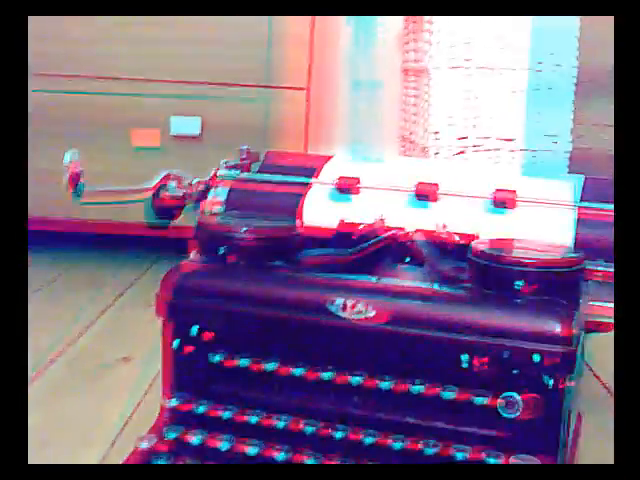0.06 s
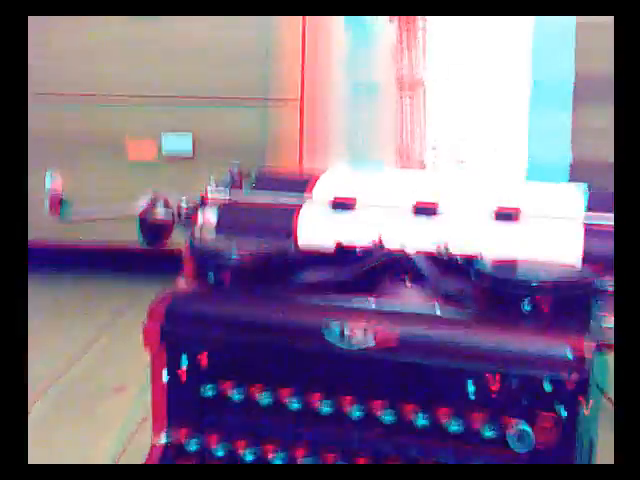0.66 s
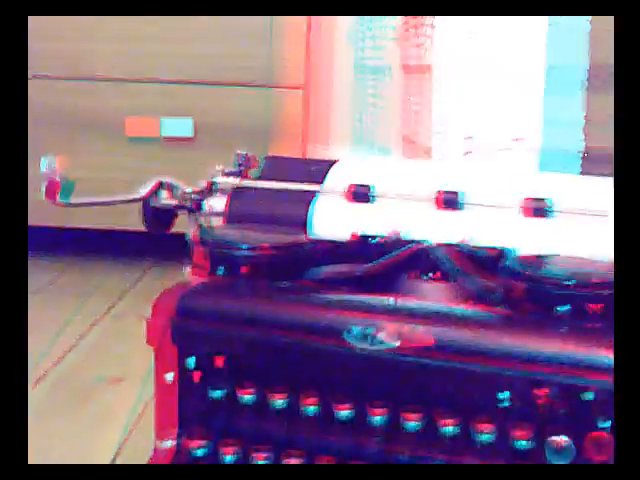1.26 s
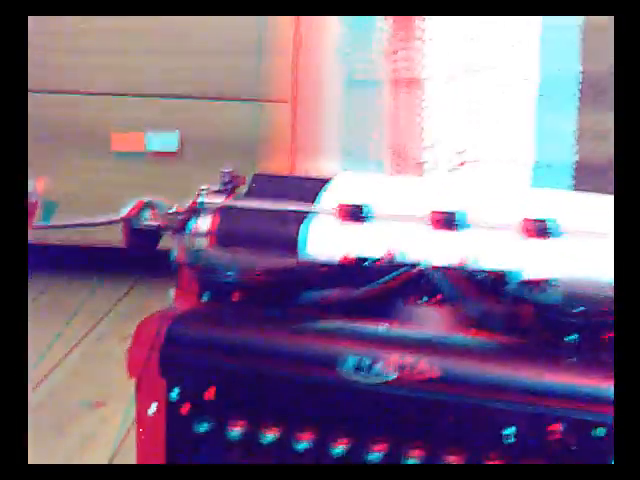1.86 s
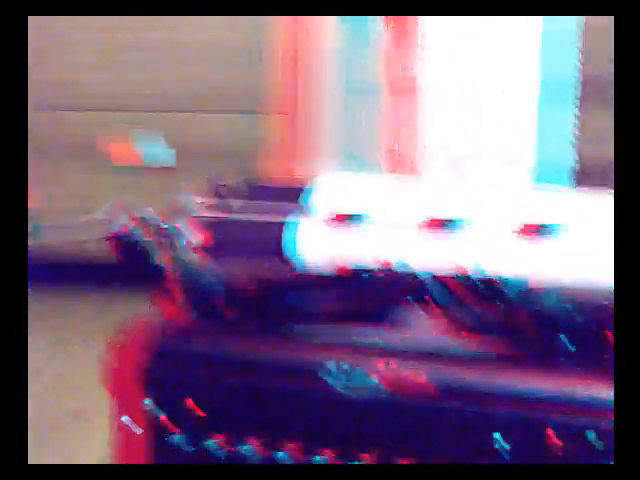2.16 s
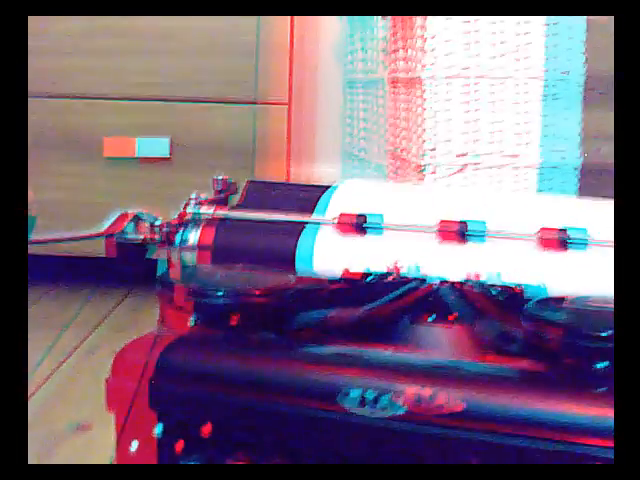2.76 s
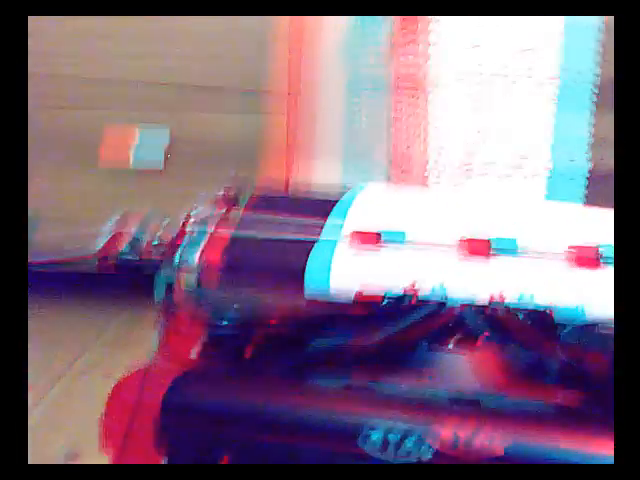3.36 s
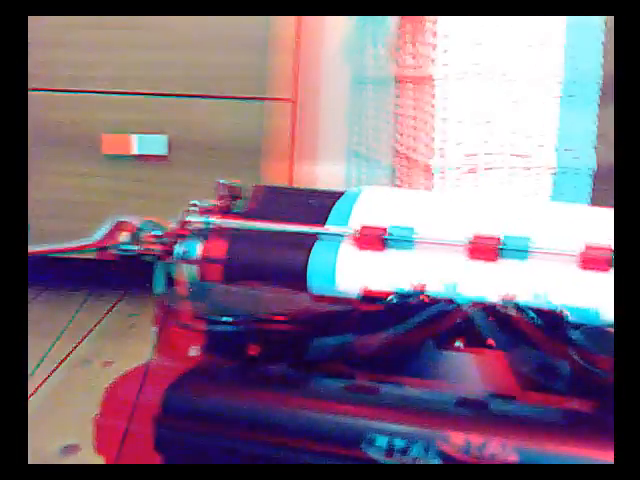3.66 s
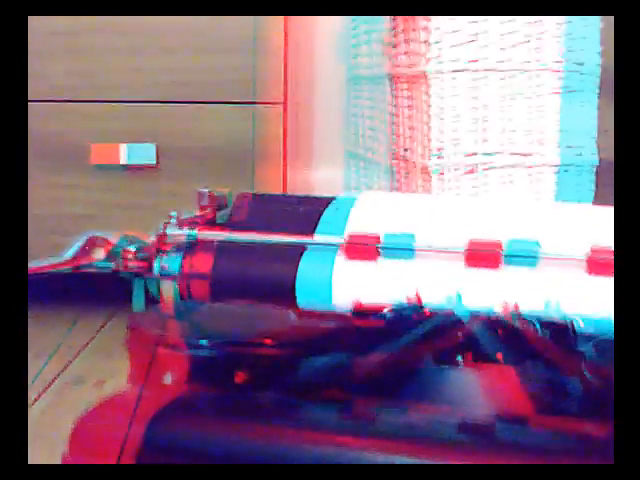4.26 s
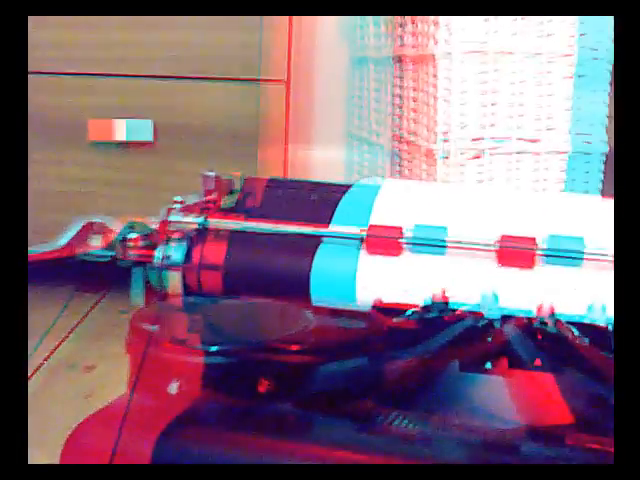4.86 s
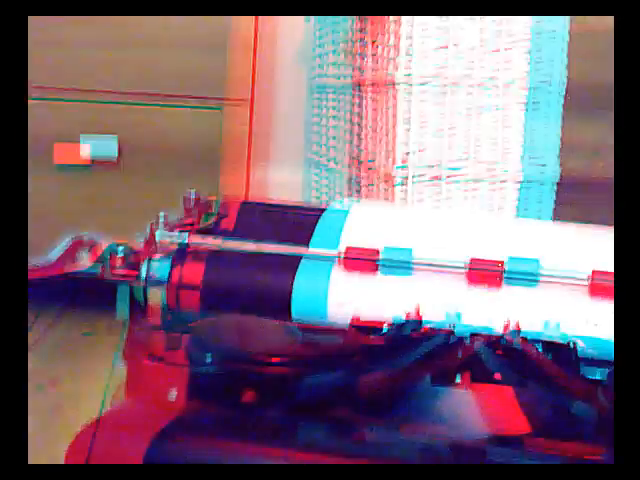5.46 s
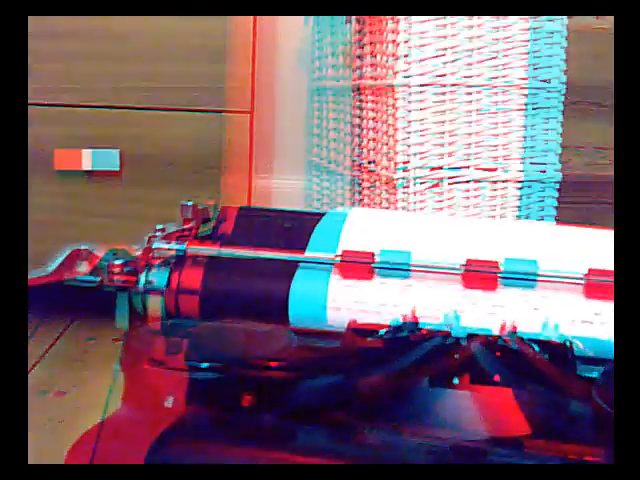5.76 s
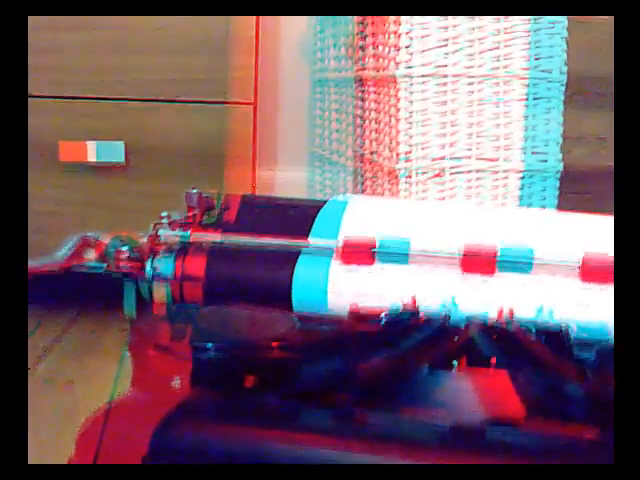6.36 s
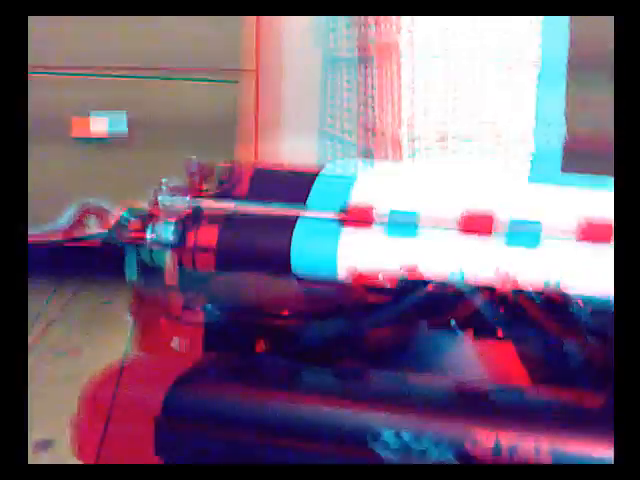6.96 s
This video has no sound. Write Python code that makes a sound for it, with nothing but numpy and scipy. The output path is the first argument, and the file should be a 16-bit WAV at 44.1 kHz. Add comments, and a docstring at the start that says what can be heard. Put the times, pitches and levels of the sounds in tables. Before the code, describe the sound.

A small walking robot crosses a wooden floor indoors, heard from a microphone on its body. For the whole seven seconds its geared servos whir in short, high, raspy moves, about three a second, with a little grinding and a faint motor whistle. The feet land and rock with irregular low knocks and light scuffs, heaviest at about 0.4, 1.3, 2.3, 4.2 and 5.2 seconds. Now and then a gear sings out in a brief rising or falling whine, most clearly near 1.5, 2, 3.4, 4, 5 and 6.7 seconds. Slack gear teeth give scattered sharp clicks, for example around 0.2, 1.6, 4.3, 4.9 and 5.3 seconds. The whirring eases slightly from about 5.5 seconds, then is strongest just after 6.5. Everything is very close, with a short, faint room echo and a soft steady hiss behind it.

```python
"""Geared servos whir right at the microphone, in short moves, about three a second.
The microphone rides on the body of a small walking robot as it crosses a wooden floor.
Now and then one loaded gear sings out in a glide, or slack teeth snap together.
The feet land and rock with low knocks that come up through the frame; the motor drive whistles faintly.
Behind the robot lie a short room tail and a soft hiss."""
import sys
import numpy as np
from scipy import signal
from scipy.fft import rfft, irfft, next_fast_len
from scipy.io import wavfile
from scipy.ndimage import map_coordinates

SR = 44100
rng = np.random.default_rng(int(sys.argv[2]) if len(sys.argv) > 2 else 0)


def master_out(mix):
    """Clip the mix to full scale and print it as 16-bit PCM to the path in sys.argv[1]."""
    frames = np.transpose(np.atleast_2d(mix))
    ceiling = np.clip(frames, -1, 1)
    pcm = np.round(ceiling * 32767).astype(np.int16)
    wavfile.write(sys.argv[1], SR, pcm)


N = 313551

# Servo moves on the way across the floor: (start [s], spin-up [s], driven length [s], whir level [dB],
# fade over the move [dB], gear mesh [Hz], grinding re whir [dB])
SERVO_MOVES = [(-.03, 0.037, 0.13, -56.5, 1, 4423, -14), (.136, .045, .29, -49, 4.5, 3900, -15),
               (0.456, .04, .29, -52, 3.5, 4251, -13.5), (.78, .055, .25, -55.5, 5, 4301, -13.5),
               (1.08, 0.034, 0.27, -53, -1.5, 4279, -11), (1.399, 0.041, 0.28, -51, 1.5, 4284, -15),
               (1.711, 0.059, 0.26, -53.5, 6, 4147, -15.5), (2.013, 0.029, 0.31, -49.5, 5, 3955, -15.5),
               (2.34, .035, .28, -52, 2, 4301, -16), (2.655, 0.052, 0.26, -53, 5.5, 4129, -12.5),
               (2.948, 0.059, .28, -52.5, 3.5, 4330, -12.5), (3.275, .055, .275, -51, -.5, 4300, -13.5),
               (3.584, .06, 0.27, -53, 3.5, 4103, -13.5), (3.892, .012, .294, -49, 2, 3930, -15.5),
               (4.215, .035, .267, -52, 2, 4353, -12), (4.529, .03, .25, -52.5, 3, 4454, -15.5),
               (4.819, .04, 0.29, -52.5, -.5, 4744, -10.5), (5.148, .02, .315, -54.5, -2, 4474, -10.5),
               (5.598, .035, 0.27, -55, 2.5, 4849, -21.5), (5.905, .06, 0.29, -55, 5, 4330, -13.5),
               (6.204, 0.059, 0.3, -55.5, 2, 4335, -12.5), (6.544, .045, 0.27, -46, 2.5, 4080, -18.5),
               (6.845, .06, 0.3, -50.5, 4.5, 4282, -15)]
def gait(hold_db=-73, hold_hz=4242, hold_grind_db=1, run_down_s=0.031, grind_down_s=0.077):
    """Whir dB, mesh Hz and grinding dB re whir as each move spins up, gains speed and runs down."""
    speed_up, start_lag = 0.03, 0.06  # shares of speed: gained as the load eases, lacking at first
    start_grind_db, slow_s = 14, 0.034  # gears grind harder while still slow
    ease_db = 1.5  # dip halfway, where the leg neither gathers nor loses speed
    t = np.arange(N) / SR
    whir = np.full(N, amp(hold_db) ** 2)  # between moves the servos only hold their position
    grind, mesh = whir * amp(hold_grind_db) ** 2, whir * hold_hz
    for start, attack_s, length, db, fade_db, mesh_hz, grind_db in SERVO_MOVES:
        on = (t > start) & (t < start + 2 * length)
        age = t[on] - start
        progress = np.minimum(age / length, 1) - 0.5  # zero at mid-move
        slow = np.exp(-age / slow_s)
        coasting = np.maximum(age - length, 0)
        level_db = db - fade_db * progress - ease_db / 2 * np.cos(2 * np.pi * progress)
        effort = np.minimum(age / attack_s, 1) * amp(level_db)
        power = (effort * np.exp(-coasting / run_down_s)) ** 2
        whir[on] += power
        mesh[on] += power * mesh_hz * (1 + speed_up * progress - start_lag * slow)
        grinding = effort * amp(grind_db + start_grind_db * slow) * np.exp(-coasting / grind_down_s)
        grind[on] += grinding ** 2
    return 10 * np.log10(whir) + strain(), mesh / whir, 10 * np.log10(grind / whir)


# Gearbox, casing and body at point-blank range, each: (frequency [Hz], relative level [dB])
GEARBOX_SPECTRUM = [(1500, -38.5), (2500, -11), (3000, -7), (3400, -1), (4000, -0.5), (4900, 0.5),
                    (5300, -3.5), (6000, -4.5), (6800, -15), (7500, -17.5), (8200, -24), (11000, -39.5)]
CASING_SPECTRUM = [(250, -7), (500, -8), (900, -12.5), (1400, -9), (1650, -2.5), (1950, 1), (2400, -2),
                   (3000, -11), (4000, 1.5), (7000, -65)]
BODY_SPECTRUM = [(20, -8), (45, -10), (65, 8), (125, -2), (180, -0.5), (225, -6), (280, -17), (500, -19.5),
                 (1000, -44)]
def servos(whir_db, mesh_hz, grind_db, tilt_db=16):
    """Three gear trains sing and rattle in their boxes; load grinds slow gears and shakes the body."""
    singing, rattle, judder = np.zeros(N), np.zeros(N), wobble(110)
    for detune in (-0.12, 0, 0.12):
        # each controller feeds its motor in uneven spurts, and all share the judder of the frame
        pulsing = np.sin(cycles(65 * np.exp(0.26 * wobble(8))))
        demand = 0.67 * pulsing + 0.72 * wobble(50) + 0.38 * judder
        spurts = amp(5.75 * np.tanh(demand))
        singing += spurts * gear_train(mesh_hz, detune)
        strike_hz = mesh_hz / 2 * np.exp(detune + 0.1 * wobble(200))
        rattle += spurts * tooth_impacts(strike_hz, scatter_db=10.5)
    # fast teeth rattle brightly, slow ones wake the gearbox's lower ring
    rattle = coloured(rattle, GEARBOX_SPECTRUM)
    low = filtered(rattle, lambda hz: 1 / (1 + (hz / 3900) ** 10))
    bright = amp(tilt_db * np.log2(mesh_hz / 4200))
    rattle = unit(low / bright + (rattle - low) * bright)
    whir = amp(-4.5) * coloured(singing, GEARBOX_SPECTRUM) + amp(-2.5) * rattle
    grind_hz = mesh_hz / 3 * np.exp(0.2 * wobble(200))
    grind = coloured(tooth_impacts(grind_hz, scatter_db=9), CASING_SPECTRUM)
    # a hard-working leg shakes the body out of proportion to its whir
    shake = noise(BODY_SPECTRUM) * amp(0.34 * (whir_db + 43) + 5.11 * wobble(12))
    return amp(whir_db) * (whir + amp(grind_db + 2) * grind + amp(-14) * shake)


def gear_train(mesh_hz, detune, wander=0.07, flutter=0.00997, skirt=0.7, teeth=10):
    """Shaft orders around one pinion's tooth rate, each swelling and fading as the contact shifts."""
    hz = mesh_hz * np.exp(detune + wander * wobble(20) + flutter * wobble(350))
    shaft, out = cycles(hz / teeth), 0
    for order in np.arange(7, 15):
        strength = np.exp(-abs(order - teeth) / skirt + 0.44 * np.tanh(wobble(70)))
        out += strength * np.sin(order * shaft + rng.uniform(0, 2 * np.pi))
    return unit(out)


def tooth_impacts(rate_hz, scatter_db):
    """One impulse of random size for each tooth that strikes."""
    strikes = np.diff(np.floor(np.cumsum(rate_hz) / SR), prepend=0) > 0
    return strikes * amp(scatter_db * rng.uniform(-0.82, 1, N)) * rng.choice([-1, 1], N)


# A leg meets resistance and its servo surges: (time [s], extra whir [dB])
SERVO_SURGES = [(.56, 3), (1.8, 2), (2.105, 3), (3.06, 4), (4.465, 1), (4.572, 2), (5.83, 1.5), (6.015, 3),
                (6.48, 2)]
def strain(landing_db=2.5, width_s=0.015, lead_s=0.021):
    """Extra whir in dB as a leg meets resistance or a foot lands; lighter feet ask less."""
    extra_db, heaviest_db = np.zeros(N + SR), max(row[1] for row in FOOTFALLS)
    landings = [(s - lead_s, landing_db * amp(db - heaviest_db)) for s, db, *_ in FOOTFALLS]
    t = np.arange(-SR // 10, SR // 10) / SR
    for s, db in landings + SERVO_SURGES:
        extra_db[round((s + t[0]) * SR):][:len(t)] += db * np.exp(-(t / width_s) ** 2)
    return extra_db[:N]


# One gear sings out close to the microphone: (start [s], end [s], first pitch [Hz], middle pitch [Hz],
# last pitch [Hz], level [dB], roughness [0-1])
GEAR_GLIDES = [(0.161, 0.256, 3050, 3460, 3750, -58, .93), (1.441, 1.539, 4050, 4344, 3850, -51.5, 0.46),
               (1.448, 1.502, 2550, 2795, 2800, -56, .5), (1.495, 1.546, 2860, 2620, 2460, -53.5, .3),
               (1.519, 1.569, 5150, 4830, 4220, -54.5, .6), (1.561, 1.61, 4320, 4770, 4980, -55, 0.45),
               (1.761, 1.83, 3660, 3414, 3382, -59.5, 0.4), (2.021, 2.126, 3393, 3492, 3720, -51.5, 0.9),
               (3.315, 3.364, 2430, 2680, 2780, -55.5, 0.51), (3.355, 3.409, 2733, 2680, 2542, -51, .2),
               (3.39, 3.451, 5094, 4780, 4550, -51, 0.76), (3.63, 3.698, 3120, 3377, 3682, -58, .85),
               (3.92, 3.992, 3586, 3913, 4115, -49.5, .55), (3.989, 4.037, 3826, 3440, 3360, -55, 0.45),
               (4.24, 4.36, 3900, 4200, 4433, -56.5, 0.75), (4.919, 4.998, 5700, 5590, 5430, -53.5, 0.61),
               (5.012, 5.144, 4800, 5006, 4255, -50, .6), (5.191, 5.275, 2410, 2640, 2730, -58.5, 0.95),
               (5.243, 5.316, 5100, 4705, 4600, -52, 0.65), (5.381, 5.473, 4512, 4733, 4823, -54.5, 0.84),
               (5.659, 5.738, 5035, 5094, 5200, -53.5, .82), (5.948, 6.024, 3900, 4170, 4430, -62, 0.3),
               (6.626, 6.73, 4550, 4140, 3860, -49.5, 0.5), (6.718, 6.81, 3596, 3530, 3810, -54, .45)]
def gear_whines(teeth=10):
    """A loaded gear glides in speed; slack makes it chatter, its off-centre pinion throbs once a turn."""
    out = np.zeros(N)
    chatter = 0.011 * wobble(140) + 0.042 * wobble(1000)
    flicker = unit(amp(3.5 * np.tanh(wobble(220))))
    runout = wobble(120)
    for start, end, first, middle, last, db, rough in GEAR_GLIDES:
        on = np.arange(round(start * SR), round(end * SR))
        progress = np.linspace(0, 1, len(on), endpoint=False)
        glide_hz = np.polyval(np.polyfit([0, 0.5, 1], [first, middle, last], 2), progress)
        phase = cycles(glide_hz * (1 + rough * chatter[on]))
        swell = amp(db + 4.5) * np.sqrt(np.sin(np.pi * progress))
        throb = 1 + 0.5 * rough * runout[on] * np.sin(phase / teeth)
        out[on] += swell * flicker[on] * throb * np.sin(phase)
    return out


# Feet on the boards just below the microphone:
# (time [s], level [dB], pitch [Hz], rocking interval [s], hardness [dB], relative scuff [dB])
FOOTFALLS = [(0.206, -42, 90.5, 0.03, -20, -33), (.405, -33, 117, 0.023, 0.5, -29.5),
             (.742, -43.5, 65, .02, -15, -22), (1.108, -52.5, 58, .02, -14, -17),
             (1.305, -35.5, 100, 0.025, -10, -30), (1.51, -42, 100.9, 0.027, -21, -23.5),
             (1.575, -47.5, 70, 0.013, -25, -30), (1.658, -36, 75.5, .019, -6.5, -30.5),
             (2.085, -49, 72, 0.029, -21, -26.5), (2.29, -33.5, 121, 0.022, -4.5, -28.5),
             (2.613, -37, 86.96, 0.026, -21.5, -27.5), (3.008, -42.5, 66.92, .012, -22.5, -29.5),
             (3.19, -39, 92.77, 0.03, -20, -27), (3.332, -38, 92, 0.026, -2, -23.5),
             (3.408, -47, 100, .011, -20, -33), (3.533, -36.5, 69, 0.02, -10, -29),
             (3.942, -47, 88.04, .011, -15, -26), (3.998, -48, 68, .011, -21, -30),
             (4.16, -33, 121.8, 0.0211, -27, -28.5), (4.272, -50, 75.9, 0.0093, -8, -31),
             (4.447, -39.5, 66, 0.022, -24, -24), (4.886, -42, 95, .022, -22, -23),
             (4.998, -40, 96.5, .034, -27, -30.5), (5.162, -35, 117.9, 0.00497, -14, -27),
             (5.214, -38, 89.5, .017, 0.5, -25.5), (5.312, -47.5, 235, 0.0093, -12, -15),
             (5.348, -51, 74.96, .011, -23, -27), (5.458, -46.5, 70, .013, -36, -27),
             (5.893, -41, 60, 0.036, -16, -24), (6.237, -44.5, 72.07, 0.026, -24, -24.5),
             (6.487, -43.5, 77.77, .022, -2.5, -27), (6.612, -45, 90.24, 0.025, -9, -22.5),
             (6.787, -45, 140.9, 0.015, 3, -20.5), (6.925, -49, 76.05, .028, -16, -22),
             (7.086, -44, 95, 0.019, -8, -26.5)]
# Every foot rocks over hard edge, sole and soft heel:
# (offset [rocking intervals], level [dB], pitch [ratio], extra hardness [dB], extra scuff [dB])
FOOT_ROCKING = [(-1, -5.5, 1.2, 4, 7.5), (0, -.5, 0.92, 0, -9), (1, -6, 0.96, -9.5, 0)]
# The frame ringing on the floorboards: (frequency [Hz], level [dB], t60 [s])
FRAME_MODES = [(66, -2, .15), (90, -1, .11), (122, 0, .11), (155, -5, .08), (195, -8, .06), (226, -4, .12),
               (315, -9, .07), (400, -12, .05)]
# A foot rubbing on wood: (frequency [Hz], relative level [dB])
SCUFF_SPECTRUM = [(20, -12), (60, -7), (200, 15.5), (330, 6.5), (600, 1), (1200, -5.5), (2500, -18),
                  (6000, -76)]
def footsteps(press_s=0.014, scuff_t60=0.19, focus_db_per_octave=8):
    """Each padded contact rings the frame's modes nearest its own pitch, and scuffs the boards."""
    knocks, rubbing, t = np.zeros(N + SR), np.zeros(N + SR), np.arange(SR // 4) / SR
    swell = np.sin(np.pi / 2 * np.minimum(t / press_s, 1)) ** 2  # the foot takes the weight
    hz, mode_db, t60 = np.transpose(FRAME_MODES)[:, :, None]
    for s, db, pitch_hz, rock_s, hard_db, scuff_db in FOOTFALLS:
        for offset, share_db, ratio, harder_db, rub_db in FOOT_ROCKING:
            weight_db = mode_db - focus_db_per_octave * abs(np.log2(hz / (pitch_hz * ratio)))
            # a hard landing reaches further into the upper modes
            weight_db += 0.51 * (hard_db + harder_db + 14) * np.log2(hz / 120)
            phase = 2 * np.pi * (hz * rng.normal(1, 0.032, hz.shape) * t + rng.uniform(size=hz.shape))
            ring = swell * np.sum(amp(weight_db - 60 * t / t60) * np.sin(phase), axis=0)
            scuff = swell * amp(scuff_db + rub_db + 10 - 60 * t / scuff_t60)
            start = round((s + offset * rock_s - press_s / 2) * SR)
            knocks[start:][:len(t)] += amp(db + share_db - 16.5) * unit(ring)
            rubbing[start:][:len(t)] += amp(db + share_db) * scuff
    return knocks[:N] + rubbing[:N] * noise(SCUFF_SPECTRUM)


# Sharp snaps from the gears, close up: (time [s], level [dB])
BACKLASH_SNAPS = [(0.2243, -47), (1.6378, -47.5), (2.109, -51), (2.2695, -49.5), (3.0598, -49.5),
                  (3.9, -48), (3.975, -56), (4.2712, -45), (4.4267, -49), (4.5648, -60), (4.873, -43.5),
                  (5.162, -53), (5.3, -46.5), (6.0344, -53), (6.5487, -52)]
def backlash(t60=0.068, attack_s=0.001):
    """Slack gear teeth slap together when the load turns round."""
    out, t = np.zeros(N + SR), np.arange(SR // 10) / SR
    spectrum = [(800, -27), (2500, 15), (4000, 15.5), (6000, -4), (8000, -3), (12000, -36)]
    envelope = amp(-60 * t / t60) * (1 - np.exp(-t / attack_s))
    for s, db in BACKLASH_SNAPS:
        out[round(s * SR):][:len(t)] += amp(db - 0.5) * envelope * noise(spectrum, len(t))
    return out[:N]


def drive_whistle(grinding_db, pitch_hz=1950, usual_grinding_db=-65, waver_db=3):
    """The switching motor drive makes the windings whistle, louder under load, with an octave above."""
    phase = cycles(pitch_hz * (1 + 0.002 * wobble(60)))
    level_db = -78 + 0.54 * (grinding_db - usual_grinding_db) + waver_db * wobble(18)
    return amp(level_db) * (np.sin(phase) + np.sin(2 * phase))


# The room around the robot: (frequency [Hz], t60 [s])
ROOM_DECAY = [(100, 1), (1500, 0.6), (10000, 0.27)]
def room(x):
    """The room answers 5 ms late with a short tail that dies sooner in the treble."""
    hz, t, spectra = signal.stft(rng.standard_normal(SR // 2), SR, nperseg=256)
    decay = amp(-60 * t / along(ROOM_DECAY, hz)[:, None])
    tail = signal.istft(spectra * decay, SR, nperseg=256)[1]
    return signal.fftconvolve(np.pad(x, (SR // 200, 0)), tail / np.linalg.norm(tail))[:N]


# Hiss and fizz behind the robot, each: (frequency [Hz], relative level [dB])
HISS_SPECTRUM = [(20, 1.5), (60, 2.5), (200, -8.5), (500, -18.5), (1200, -14.5), (2000, -25), (4500, -4),
                 (7500, -25.5), (10200, -20), (11000, -30), (12000, -40)]
FIZZ_SPECTRUM = [(3000, -16), (6500, -0.5), (8000, 2), (10200, 5), (11000, -8), (12000, -23)]
def background():
    """A steady hiss, and a faint fizz that flickers in the top treble."""
    hiss = amp(-65.5) * noise(HISS_SPECTRUM)
    flicker = unit(amp(6 * np.tanh(wobble(85) - 0.6)))
    return hiss + amp(-73.5) * flicker * noise(FIZZ_SPECTRUM)


def amp(db):
    """Decibels to gain."""
    return 10 ** (np.asarray(db) / 20)


def unit(x):
    """Scale to rms 1."""
    return x / np.sqrt(np.mean(x ** 2) + 1e-20)


def along(points, hz):
    """Read (Hz, value) points on a log frequency axis."""
    point_hz, values = np.transpose(points)
    return np.interp(np.log(hz + 1), np.log(point_hz + 1), values)


def wobble(rate):
    """A smooth random curve, rate knots a second."""
    knots = rng.standard_normal(int(N * rate / SR) + 4)
    fine = np.arange(4 * len(knots) - 4) / 4
    return np.interp(np.arange(N) * rate / SR, fine, map_coordinates(knots, [fine]))


def filtered(x, response):
    """x through a gain given as a function of Hz."""
    size = next_fast_len(len(x) + 8192)
    return irfft(rfft(x, size) * response(np.fft.rfftfreq(size, 1 / SR)), size)[:len(x)]


def coloured(x, spectrum):
    """x shaped by (Hz, dB) points, at rms 1."""
    return unit(filtered(x, lambda hz: amp(along(spectrum, hz))))


def noise(spectrum, samples=N):
    """Noise shaped by (Hz, dB) points, at rms 1."""
    return coloured(rng.standard_normal(samples), spectrum)


def cycles(hz):
    """Phase in radians of a moving frequency."""
    return 2 * np.pi * np.cumsum(hz) / SR


def scene():
    """One microphone on the robot's body: the machine close up, the room faintly behind it."""
    whir_db, mesh_hz, grind_db = gait()
    robot = servos(whir_db, mesh_hz, grind_db) + gear_whines() + footsteps() + backlash()
    robot += drive_whistle(whir_db + grind_db)
    # the bass reaches the microphone through the frame; so small a body radiates little of it
    airborne = filtered(robot, lambda hz: hz ** 2 / (hz ** 2 + 400 ** 2))
    return (robot + amp(-14) * room(airborne) + background())[None]


def record(dry, top_hz=12200):
    """The recorder keeps nothing above its band limit."""
    return np.array([filtered(channel, lambda hz: hz < top_hz) for channel in dry])


dry = scene()
out = record(dry)
master_out(out)
```